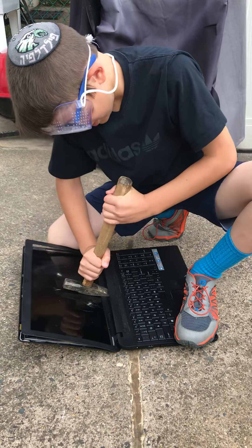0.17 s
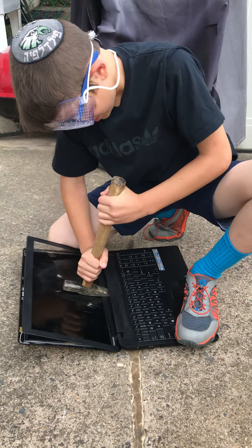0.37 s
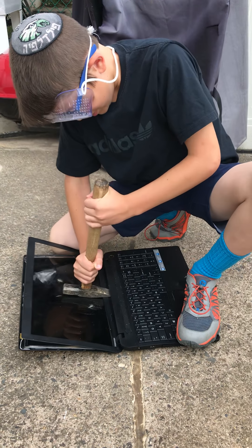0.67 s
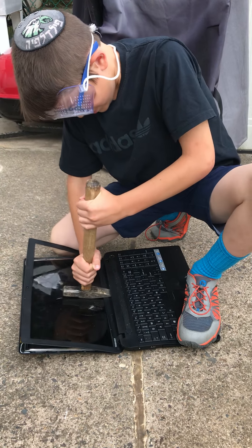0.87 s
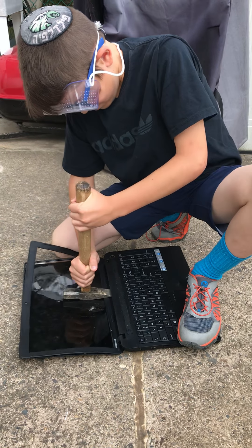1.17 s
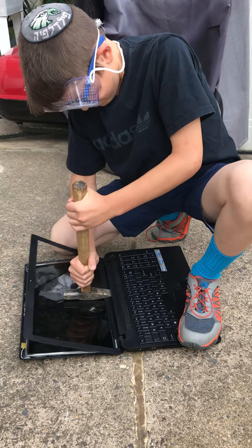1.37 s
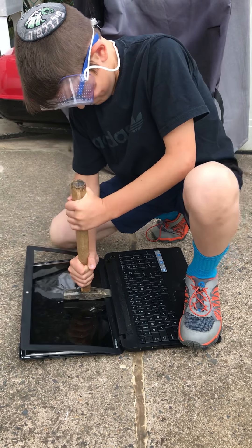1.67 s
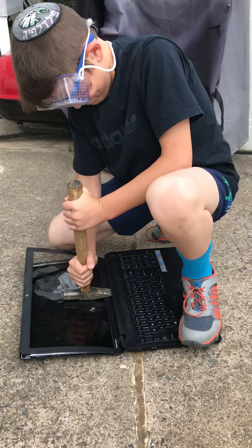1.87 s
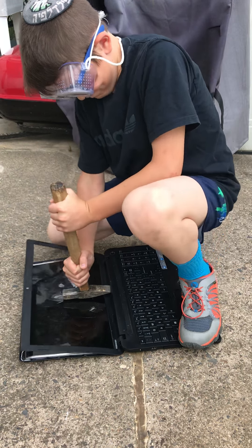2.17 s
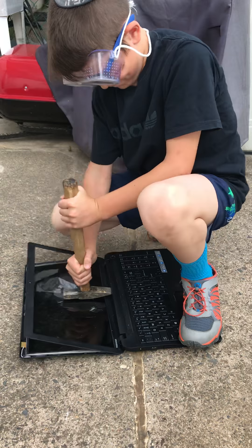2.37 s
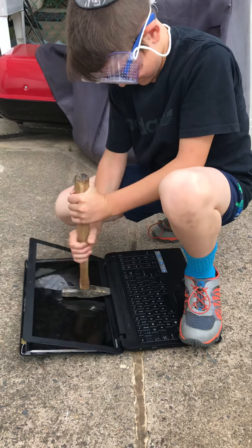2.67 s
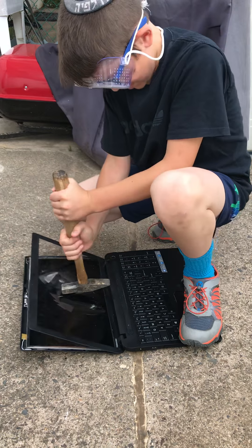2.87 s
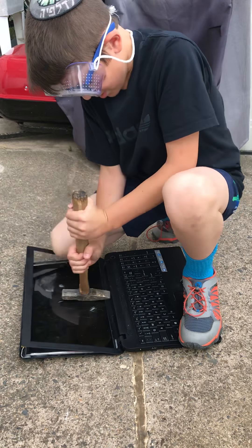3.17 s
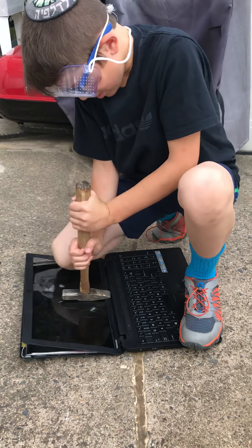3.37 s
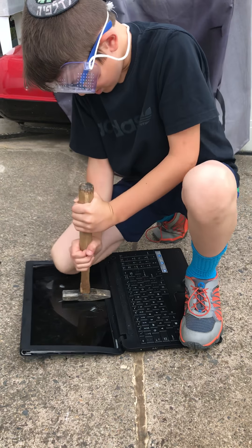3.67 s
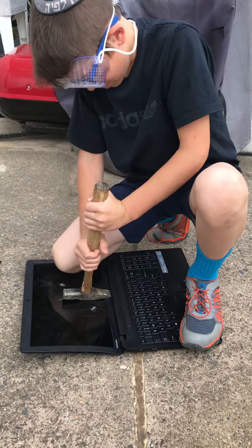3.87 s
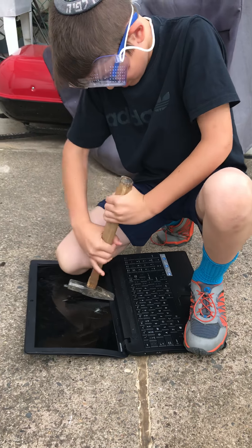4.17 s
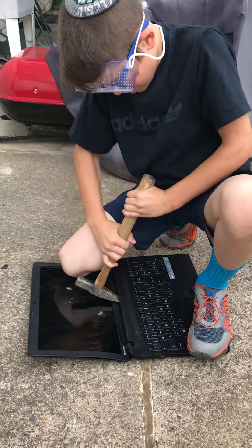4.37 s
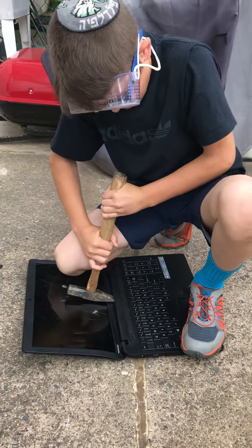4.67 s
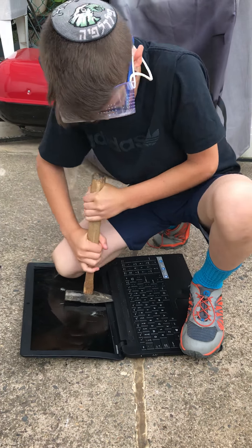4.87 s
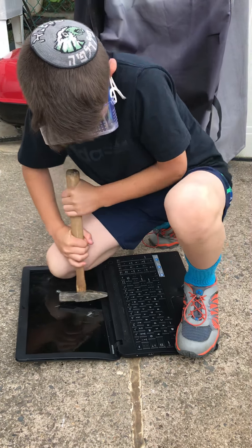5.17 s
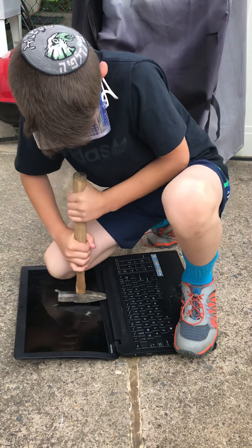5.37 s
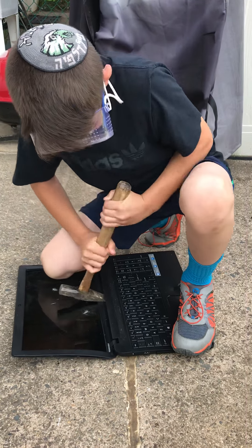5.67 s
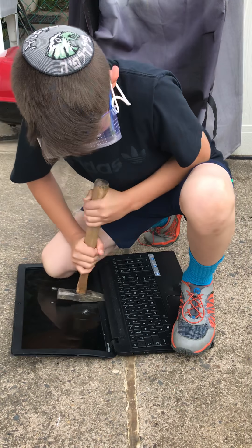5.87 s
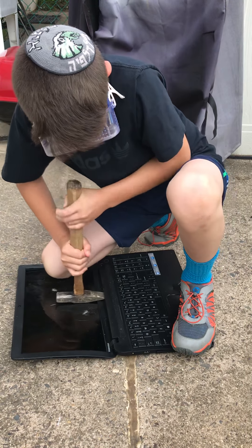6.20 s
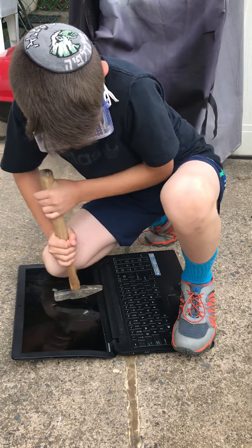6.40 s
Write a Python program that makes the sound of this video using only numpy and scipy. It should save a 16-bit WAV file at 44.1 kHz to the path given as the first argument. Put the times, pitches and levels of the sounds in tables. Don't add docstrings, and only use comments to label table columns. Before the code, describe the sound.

A hammer head pries and grinds a laptop's cracked screen on concrete outdoors, sharp plastic and glass snaps bursting irregularly over a faint far drone.

```python
import sys
import numpy as np
from scipy import signal
from scipy.fft import rfft, irfft, next_fast_len
from scipy.io import wavfile
from scipy.ndimage import uniform_filter1d

SR = 44100
rng = np.random.default_rng(int(sys.argv[2]) if len(sys.argv) > 2 else 0)


def gain_from_db(level_db):
    decades = np.asarray(level_db, float) / 20
    return 10 ** decades


def digitize_waveform(pressure):
    field = np.atleast_2d(pressure).T
    bounded = np.clip(field, -1, 1)
    quanta = np.round(bounded * 32767).astype(np.int16)
    wavfile.write(sys.argv[1], SR, quanta)


N = 288237


def evened(x):
    return x / np.sqrt(np.mean(x ** 2) + 1e-20)


def read(points, hz):
    f, value = np.transpose(points)
    return np.interp(np.log(hz + 1), np.log(f + 1), value)


def along(rows):
    return np.interp(np.arange(N) / SR, *np.transpose(rows))


def add(mix, s, sound):
    part = mix[max(round(s * SR), 0):][:len(sound)]
    part += sound[:len(part)]


def coloured(x, points):
    size = next_fast_len(len(x))
    gain = gain_from_db(read(points, np.fft.rfftfreq(size, 1 / SR)))
    return evened(irfft(rfft(x, size) * gain, size)[:len(x)])


# (frequency [Hz], width [Hz], level [dB])
DRONE = [(58.6, 20, -51), (116.5, 10.7, -53.5), (176, 20.4, -61.5), (235.8, 9, -57), (287.3, 18, -68.5),
         (342, 15, -69)]
# (time [s], level [dB])
THROB = [(0.0, -53), (0.4, -42), (0.73, -55.5), (1.05, -42.5), (1.27, -56.5), (1.98, -47), (2.53, -73),
         (2.54, -55.5), (4.4, -45), (4.84, -58), (5.11, -45), (6.4, -46.5), (6.48, -44), (6.53, -47)]


def drone():
    t, out = np.arange(N) / SR, np.zeros(N)
    throb_db = along(THROB)
    throb_db = throb_db - throb_db.mean()
    for k, (hz, width, db) in enumerate(DRONE):
        r = np.exp(-np.pi * width / SR)
        waver = signal.lfilter([1], [1, -2 * r, r * r], [1, 1j] @ rng.standard_normal((2, N)))
        order = evened((waver * np.exp(2j * np.pi * hz * t)).real)
        out += gain_from_db(db + throb_db * (k == 0)) * order
    return out


# (frequency [Hz], level [dB per Hz])
AIR = [(21, -27.5), (36, -5), (116, 4), (169, -5), (248, -8.5), (288, -9.5), (353, -13.5), (401, -20.5),
       (1190, -18.5), (1390, -23.5), (3840, -29), (8870, -40.5), (10600, -46), (12000, -41.5),
       (15500, -40.5)]


def air():
    return gain_from_db(-49.5) * coloured(rng.standard_normal(N), AIR)


def specks():
    clicks = gain_from_db(4.0 * np.minimum(rng.exponential(1, N), 3))
    clicks *= rng.choice([-1., 1.], N) * (rng.random(N) < 45 / SR)
    t = np.arange(200) / SR
    speck = rng.standard_normal(200) * gain_from_db(-60 * t / .004)
    bright = [(2500, -40), (6000, -19.5), (10000, 5.0), (16000, -4.5)]
    return gain_from_db(-82) * coloured(signal.oaconvolve(clicks, speck)[:N], bright)


def modes(table, hz, chance, centre_hz):
    f, width, db = np.transpose(table)[:, :, None]
    f = f * (.94 + .12 * chance[:len(f), :1])
    db = db + 3 * chance[:len(f), 1:] - 10.5 * np.log2(f / centre_hz) ** 2
    resonance = 1 / (1 + 2j * (hz - f) / width)
    skirts = (1j * hz / f) ** 2 / (1 + 1j * hz / f) ** 3 / (1 + 1j * (hz - f) / (1.35 * width))
    return (gain_from_db(db) * resonance * skirts).sum(0)


# (frequency [Hz], width [Hz], level [dB])
LID = [(356, 130, -10), (574, 260, -4), (700, 960, -10.5), (896, 250, 2.5), (1053, 1040, 9.5)]
PANEL = [(1320, 700, -1), (1657, 940, 7), (2226, 1140, 5), (3029, 1440, 3), (4000, 390, -1)]
GLASS = [(4640, 800, 4), (6260, 1580, -7.5), (6670, 2130, -3), (8260, 3000, -1.5)]
SPLINTER = [(10460, 5300, 7), (11510, 970, 5), (12870, 2900, -7)]
# (level [dB], t60 [s])
RATTLE = [
    (-8, 0.077),
    (-6.5, 0.061),
    (-12.5, 0.081),
    (-18, 0.11),
]
GROUND = .0043, -15.5


def snap(mix, s, levels_db, t60, place):
    crack, spread, shake = rng.standard_normal((3, 4096))
    chance = rng.random((4, 5, 2))
    t, hz = np.arange(4096) / SR, np.fft.rfftfreq(4096, 1 / SR)
    lid_hz, panel_hz, loose_db = place
    centres_hz = 780 * (lid_hz / 830) ** 2.46, panel_hz, 6000, 11500
    clumps_db = 2.57 * evened(uniform_filter1d(spread, size=70))
    run = crack * gain_from_db(3.5 * spread - 60 * t / np.clip(t60, .002, .1))
    run[0] = 3.5
    bending = np.exp(-4j * np.pi * 0.00097 * np.sqrt(1000 * hz))
    echo = 1 + gain_from_db(GROUND[1]) * np.exp(-2j * np.pi * hz * GROUND[0])
    sound = 0
    for k, table in enumerate((LID, PANEL, GLASS, SPLINTER)):
        rattle_db, ring = RATTLE[k]
        rattle = shake * gain_from_db(rattle_db + loose_db + clumps_db - 60 * t / ring)
        rattle = rattle * (1 - np.exp(-t / 0.00065))
        body = modes(table, hz, chance[k], centres_hz[k])
        part = irfft((rfft(run) * echo + rfft(rattle)) * bending * body)
        sound = sound + gain_from_db(levels_db[k]) * part / abs(part).max()
    add(mix, s - .0003, sound * signal.windows.tukey(2 * len(t), .2)[len(t):])


# (lid centre [Hz], panel centre [Hz], looseness [dB])
TICK_PLACE = (860, 2830, -3.5)


def tick(mix, s, levels_db):
    snap(mix, s, levels_db, .006, TICK_PLACE)


# (time [s], glass level [dB], splinter re glass
# [dB])
GLASS_TICKS = [(0.075, -42, -16), (.1222, -51.5, -5), (0.189, -49, -5), (.2059, -36.5, -8),
               (0.2208, -30, -4.5), (.258, -43, -8), (.3434, -58, 3), (0.3747, -52, 0), (.393, -50, 1.5),
               (.4013, -37.5, 2), (.453, -44, -10), (.476, -31, -11), (0.5012, -38, -15), (0.515, -38, -15),
               (.5254, -42, -12), (.561, -53, 3.5), (.596, -52, 0), (.656, -55, 0), (0.7263, -44, 1),
               (0.7444, -27.5, -2.5), (0.9193, -44, -5), (1.053, -52, -0.5), (1.297, -49.5, -3),
               (1.313, -36.5, -8), (1.3236, -37, -4), (2.2192, -37, -11), (2.272, -34.5, -9.5),
               (2.283, -38.5, -6.5), (2.689, -44, -8),
               (3.3284, -45, -9), (3.372, -47.5, -2), (3.5802, -37.5, -4), (3.5998, -39, 6),
               (3.609, -37, -10), (3.638, -32.5, -2.5), (3.6605, -30, -10), (3.6832, -40, -6),
               (3.6893, -30.5, -4), (6.2975, -46, -6), (3.8267, -38.5, -11), (6.097, -43, -10),
               (3.877, -43, -9), (3.9975, -37, -15), (4.0516, -45, -12), (4.0923, -41, -5), (4.24, -41, -3),
               (4.297, -47.5, -3), (4.374, -34.5, -13), (4.425, -42, 0), (4.4485, -38.5, -2),
               (4.8199, -46, -1), (5.0388, -36.5, -7), (5.102, -39, -6), (5.9036, -50, -13),
               (5.971, -48, -8.5), (6.1243, -44.5, -9), (6.3114, -38, -3.5), (6.3283, -42.5, -3),
               (6.3377, -36.5, -3)]


def glass_ticks(mix):
    for s, db, fine_db in GLASS_TICKS:
        tick(mix, s, db + np.array([-24, -6, 1.5, fine_db + 5.5]))


# (time [s], frequency [Hz], level [dB])
CHIRP = [
    (0.241, 4520, -55),
    (0.26, 4290, -53),
    (0.281, 4000, -48),
    (.295, 3270, -53),
    (0.312, 3250, -62),
]


def bird(mix):
    s, hz, db = np.transpose(CHIRP)
    t = np.arange(s[0], s[-1], 1 / SR)
    flutter = evened(uniform_filter1d(rng.standard_normal((2, len(t))), size=120))
    pitch_hz = np.interp(t, s, hz) * (1 + 0.028 * flutter[0])
    whistle = np.sin(2 * np.pi * np.cumsum(pitch_hz) / SR)
    level = gain_from_db(np.interp(t, s, db) - 9 + 4 * flutter[1])
    add(mix, s[0], level * whistle * signal.windows.tukey(len(t), .3))


# (time [s], panel level [dB], glassy edge re panel [dB])
CLIP_TICKS = [(0.5729, -29, -10), (0.6239, -35, -6.5), (1.1155, -37.5, -8.5), (1.182, -42, -15),
              (1.2466, -44, -13), (1.3366, -36.5, -15), (1.4524, -42.5, -6), (1.9398, -42, -8),
              (2.5234, -38, -18), (2.5717, -46, -22), (2.6517, -32.5, -16), (3.2229, -40, -7),
              (3.4502, -42, -22), (3.9125, -37.5, -15), (3.951, -43.5, -9), (4.1904, -39, -12.5),
              (4.342, -44, -17), (4.5275, -47.5, -8), (4.6303, -45.5, -5), (1.2609, -29, -9),
              (4.8966, -40, -7.5), (5.07, -40, -20), (5.1697, -43.5, -12), (5.2544, -47, -18),
              (5.58, -38, -10), (5.6632, -44, -12), (5.8021, -40.5, -9.5), (6.011, -41, -25),
              (1.177, -48, -8)]


def clip_ticks(mix):
    for s, db, edge_db in CLIP_TICKS:
        tick(mix, s, db + np.array([-15, 1.5, edge_db + 8, edge_db - 5]))


# (start [s], length [s], level [dB])
RUSTLE = [
    (0.59, 0.71, -60.5),
    (2.0, 0.83, -56.5),
    (2.69, 1.27, -59.5),
    (4.3, 0.51, -62),
    (4.9, 1.26, -56),
]


def rustle():
    rub = [(900, -38), (2000, 4.5), (4000, -0.5), (8000, -4.5), (16000, -12)]
    moving = np.zeros(N)
    for start, length, db in RUSTLE:
        add(moving, start, gain_from_db(db - 6.0) * signal.windows.tukey(round(length * SR), .7))
    return moving * coloured(rng.standard_normal(N), rub)


# (time [s], lid knock level [dB], lid centre [Hz])
KNOCKS = [
    (0.669, -47, 850),
    (2.521, -38.5, 1000),
    (2.742, -23.5, 555),
    (3.223, -39, 1000),
    (4.738, -54, 850),
    (4.94, -25.5, 614),
    (5.545, -37, 700),
    (5.719, -26.5, 890),
    (6.066, -34.5, 605),
    (6.364, -17.5, 690),
]


def knocks(mix):
    for s, lid_db, lid_hz in KNOCKS:
        snap(mix, s, lid_db + np.array([1, -43, -30, -39]), 0.011, (lid_hz, 1500, -3))


def breaks(mix, rows, lid_hz):
    for s, lid_db, panel_db, glass_db, t60 in rows:
        splinter_db = 0.5 * glass_db + 0.5 * panel_db - 6
        panel_hz = np.clip(1865 * 2 ** ((panel_db - lid_db) / 29.5), 1250, 6000)
        loose_db = 2 + 3.5 * np.log2(abs(t60) / 0.017) + 0.01 * (panel_db + 16)
        levels_db = np.add([lid_db, panel_db, glass_db, splinter_db], -1.5)
        snap(mix, s, levels_db, t60, (lid_hz, panel_hz, loose_db))


# (time [s], lid knock level [dB], panel level [dB], glass crack level [dB], run-out t60 [s])
PRISED = [(1.548, -38, -26.5, -61, .015), (1.5702, -24, -23, -48, 0.026), (1.6048, -29, -10.5, -9.5, 0.019),
          (1.876, -38.5, -16.5, -11, 0.014), (1.958, -15.5, -12, -12, 0.0042), (1.9619, -8, -3, -1, 0.027),
          (2.016, -33, -19.5, -18, 0.017), (2.1593, -39, -24, -17, 0.0046), (2.291, -21, -7, -4.5, 0.047),
          (2.2952, -15, -6.5, -3, 0.0077), (2.2986, -9.5, -8.5, -6, 0.0055), (2.305, -35, -8, -7, 0.012),
          (2.7357, -7, -5.5, -10.5, 0.03), (2.7447, -27, -19, -22, .024), (2.9508, -31.5, -31, -38, 0.0096),
          (2.9696, -33, -24.5, -31, 0.052), (2.9768, -25, -18, -35, .012), (3.028, -33.5, -29, -50, 0.037),
          (3.497, -42, -21, -49, 0.1), (3.5057, -39, -21, -8, 0.0093), (3.5079, -29, -14, -47, 0.09),
          (3.521, -48, -19, -21.5, 0.017)]


def prised(mix):
    breaks(mix, PRISED, lid_hz=903)


# (start [s], length [s], first level [dB], last level [dB])
SCRAPES = [
    (2.321, 0.043, -28.5, -51),
    (2.352, 0.1, -50, -58),
    (3.168, 0.07, -60, -52),
    (3.215, 0.091, -49.5, -47.5),
    (3.524, 0.024, -39, -66),
    (3.63, .09, -46.5, -54),
    (4.224, 0.036, -65, -37),
    (4.976, 0.023, -58, -41.5),
    (5.32, 0.02, -47.5, -67),
]
# (frequency [Hz], level [dB per Hz])
GRIT = [(500, -56.5), (1200, -12.5), (2600, -14), (3700, -6.5), (5000, -12.5), (8000, -15), (10500, -21),
        (15600, -19)]


def scrapes():
    grains = rng.standard_normal(N) * gain_from_db(3.1 * np.minimum(rng.exponential(1, N), 3))
    grains *= rng.random(N) < 10000 / SR
    grains *= gain_from_db(2.3 * evened(uniform_filter1d(rng.standard_normal(N), size=250)))
    stroke = np.zeros(N)
    for start, length, first_db, last_db in SCRAPES:
        size = round(length * SR)
        level = gain_from_db(np.linspace(first_db, last_db, size))
        add(stroke, start, level * signal.windows.tukey(size, .45))
    return stroke * coloured(grains, GRIT)


# (time [s], lid knock level [dB], panel level [dB], glass crack level [dB], run-out t60 [s])
PRESSED = [(3.7968, -44, -26, -24.5, 0.022), (4.2569, -27, -20, -36, 0.016),
           (4.2636, -34.5, -47, -38.5, .012), (4.9383, -25, -21.5, -22, 0.028),
           (4.9989, -20, -22.5, -32, 0.016), (5.01, -25.5, -22.5, -33, 0.025),
           (5.2767, -35.5, -0.5, -20, 0.0007), (5.3186, -40, -37, -29.5, .011),
           (5.4254, -41.5, -32, -57, 0.0089), (5.4786, -70, -24, -16, .009),
           (5.5176, -18, -11.5, -9, 0.0076), (5.7173, -53, -40, -41.5, 0.027),
           (5.9609, -39, -45, -57, 0.024), (6.0327, -30, -25.5, -41, 0.014),
           (6.0631, -28, -26.5, -27.5, 0.03), (6.3598, -19.5, -19.5, -37, 0.057),
           (6.3642, -11.5, -12.5, -13.5, 0.015), (6.3693, -22.5, -30, -18.5, 0.011)]


def pressed(mix):
    breaks(mix, PRESSED, lid_hz=715)


def surroundings(x):
    taps = np.zeros(SR // 2)
    at = np.arange(400, len(taps) - 20, 20)
    taps[at + rng.integers(0, 20, len(at))] = rng.choice([-1., 1.], len(at))
    hz, t, z = signal.stft(taps, SR, nperseg=128)
    fade = gain_from_db(-60 * t / 0.19 - 0.19 * hz[:, None] / 1000)
    far = signal.istft(z * fade, SR, nperseg=128)[1]
    return x + gain_from_db(-23.5) * signal.oaconvolve(x, far / np.linalg.norm(far))[:N]


def scene():
    background = drone() + air() + rustle()
    near = specks() + scrapes()
    for source in (glass_ticks, bird, clip_ticks, knocks, prised, pressed):
        source(near)
    return (surroundings(near) + background)[None]


def low_pass(x):
    return signal.sosfilt(signal.butter(12, 17130, fs=SR, output="sos"), x)


# (frequency [Hz], level [dB])
EDGE = [(28, -23.5), (45, 3), (15500, 2), (16000, -21), (16800, -22), (17300, -33.5)]


def record(dry):
    size = next_fast_len(N)
    limited = dry / (1 + abs(dry / .76) ** 4) ** .25
    path = gain_from_db(read(EDGE, np.fft.rfftfreq(size, 1 / SR)))
    heard = irfft(rfft(limited, size) * path, size)[:, :N]
    return low_pass(heard)


dry = scene()
out = record(dry)
digitize_waveform(out)
```